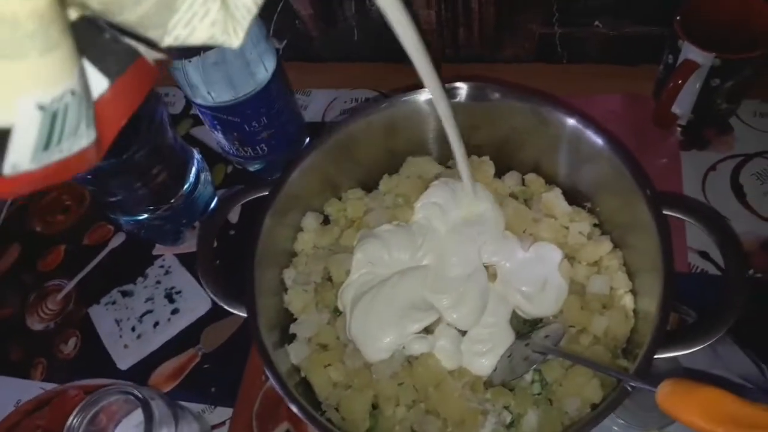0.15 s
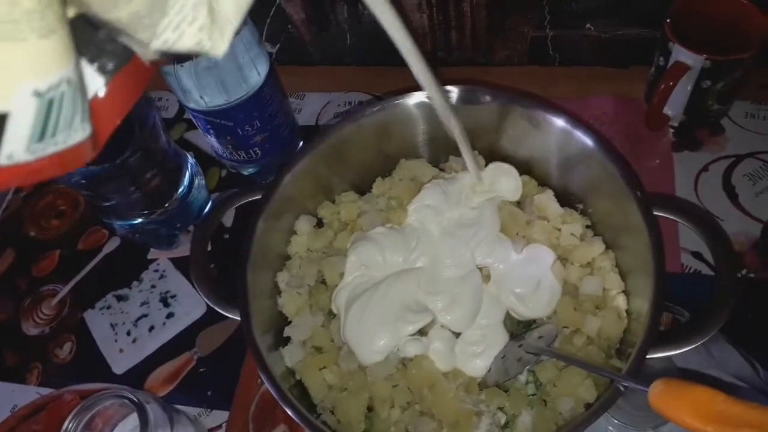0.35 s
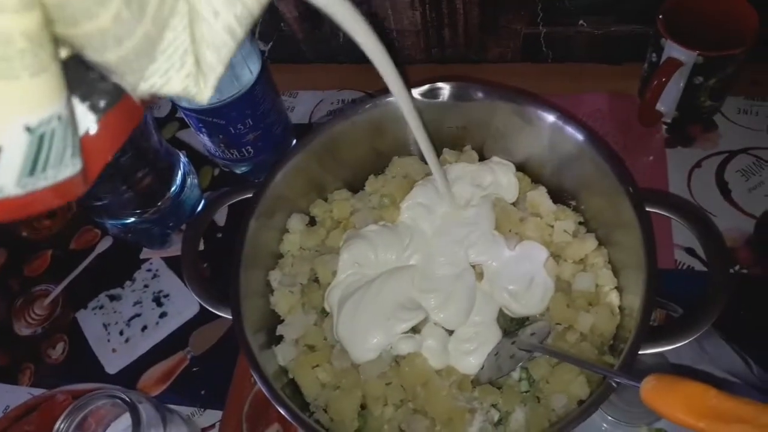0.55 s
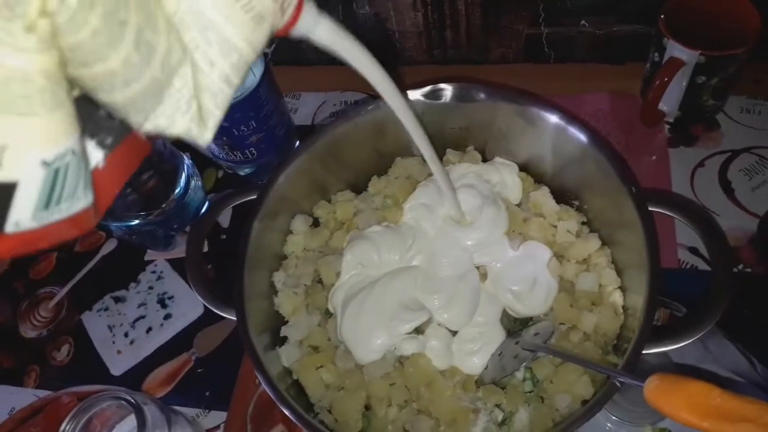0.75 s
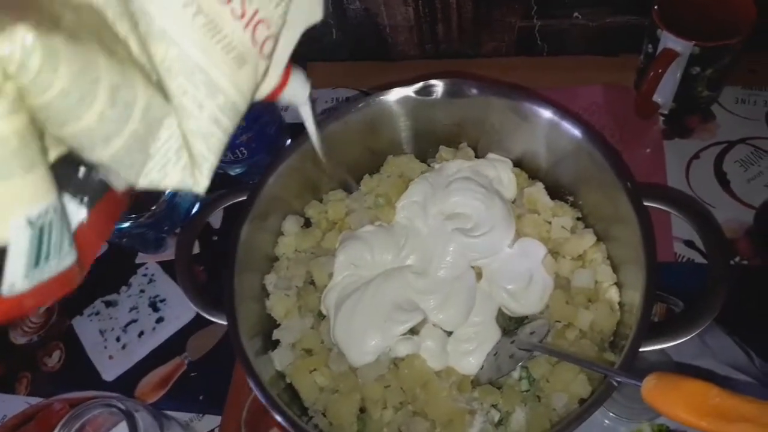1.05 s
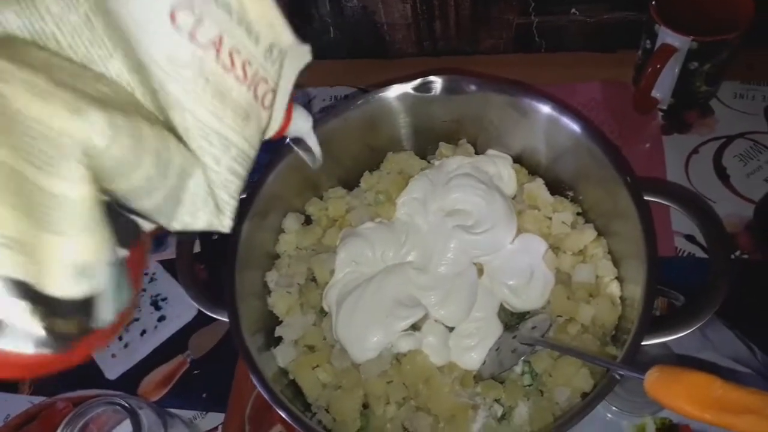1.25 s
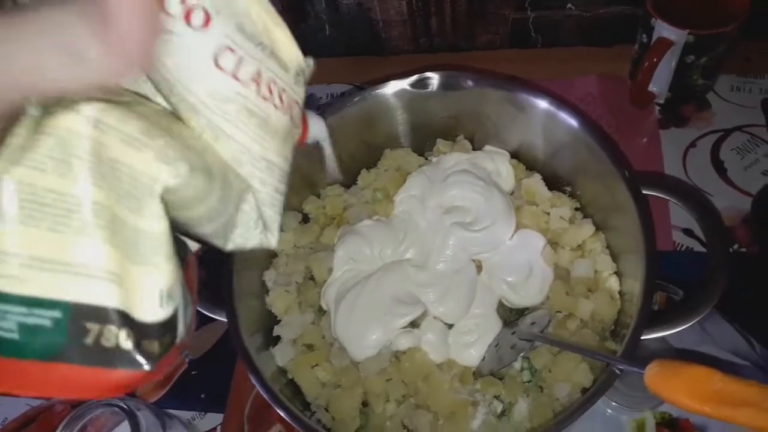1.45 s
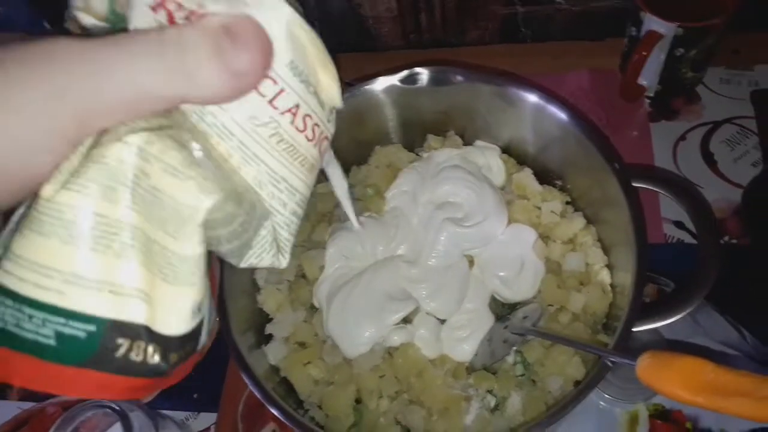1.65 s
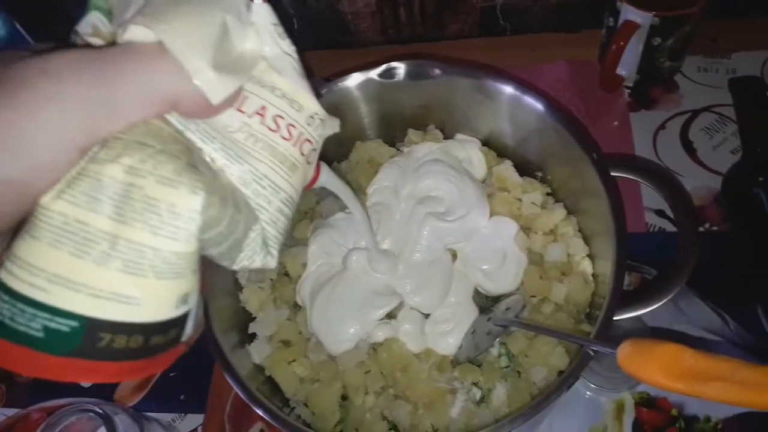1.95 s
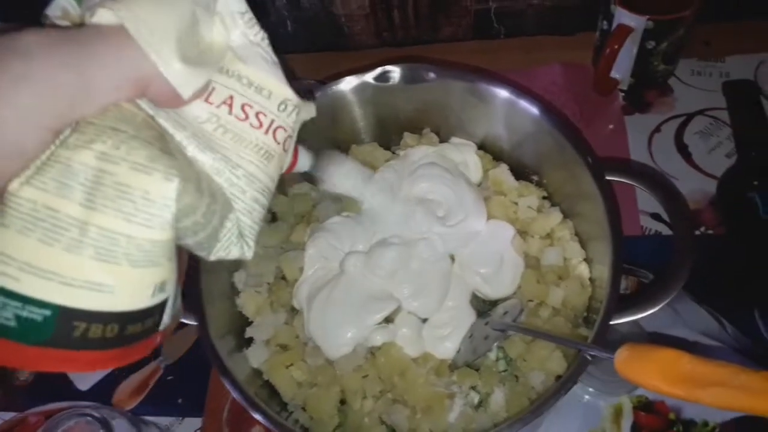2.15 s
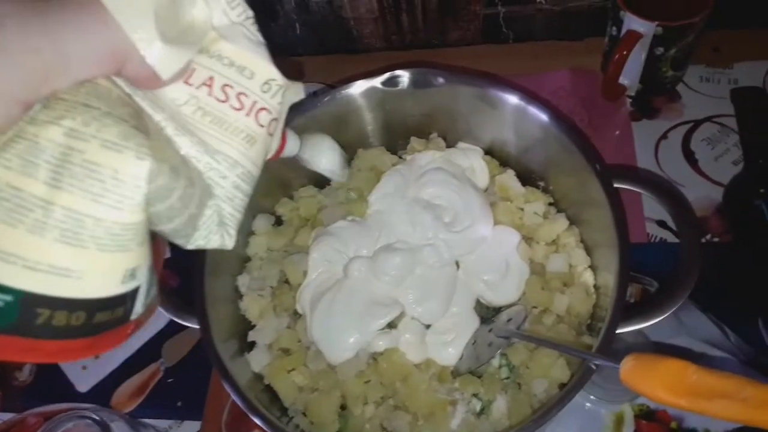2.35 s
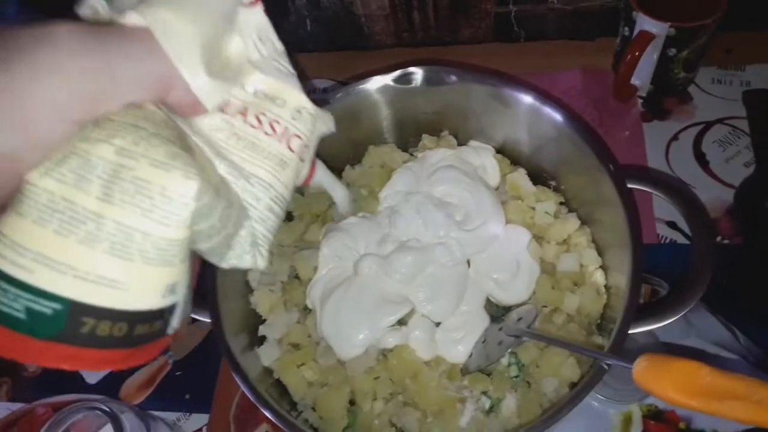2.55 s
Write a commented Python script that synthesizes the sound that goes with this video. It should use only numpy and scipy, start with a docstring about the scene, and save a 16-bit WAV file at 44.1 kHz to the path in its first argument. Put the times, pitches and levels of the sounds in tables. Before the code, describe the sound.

Mayonnaise squirts almost silently from a plastic pouch with tiny ringing pops, the film crinkles under a new grip, then trapped air splutters loudly through the nozzle, close up, echoing briefly around a kitchen.

```python
"""Mayonnaise from a pouch, close microphone

Mayonnaise is squeezed from a soft plastic pouch into a pot, close by in a small, live kitchen.
Tiny bubbles pop as ringing bursts over the wet clicks of the stream, which sputters out.
The film crackles under a new grip: short coloured clicks that excite the pouch and the taut film.
Then trapped air spits through the nozzle: a slowing run of loud, very fast upward chirps that fill the room."""
import sys
import numpy as np
from scipy import signal
from scipy.fft import rfft, irfft
from scipy.io import wavfile
from scipy.ndimage import uniform_filter1d, minimum_filter1d

SR = 44100
rng = np.random.default_rng(int(sys.argv[2]) if len(sys.argv) > 2 else 0)


def pcm_store(signal):
    """Save signal as 16-bit PCM."""
    levels = np.round(np.clip(np.atleast_2d(signal), -1, 1) * 32767)
    wavfile.write(sys.argv[1], SR, levels.astype(np.int16).T)


N = 119070
TOP_HZ = 15400  # upper limit of the pop bands and of the microphone signal


def undb(db):
    """Turn dB into an amplitude factor."""
    return 10 ** (np.asarray(db) / 20)


def unit(x):
    """Scale to rms 1."""
    return x / np.sqrt(np.mean(x ** 2) + 1e-20)


def on_log(points, hz):
    """Read (Hz, value) points on a log-frequency axis."""
    p = np.array(points)
    return np.interp(np.log(hz + 1), np.log(p[:, 0]), p[:, 1])


def curve(points):
    """Gain over time from (s, dB) points."""
    return undb(np.interp(np.arange(N) / SR, *np.array(points).T))


def response(points, size=2048):
    """Causal minimum-phase impulse response with the given (Hz, dB) colour, by folding the cepstrum."""
    hz = np.arange(size // 2 + 1) * SR / size
    cepstrum = irfft(np.log(undb(on_log(points, hz))))
    cepstrum[1:size // 2] *= 2
    cepstrum[size // 2 + 1:] = 0
    return irfft(np.exp(rfft(cepstrum)))


def colour(x, points):
    """Filter by (Hz, dB) points."""
    return signal.fftconvolve(x, response(points))[:len(x)]


def resonate(x, hz, width, db):
    """What one resonance adds to a sound: a peak at hz, width in Hz."""
    return undb(db) * signal.lfilter(*signal.iirpeak(hz, hz / width, fs=SR), x)


def add(out, start_s, x):
    """Mix a sound in at its time."""
    i = max(int(start_s * SR), 0)
    out[i:i + len(x)] += x[:max(N - i, 0)]


def ramp(u):
    """Smooth step from 0 to 1."""
    return np.sin(np.pi / 2 * np.clip(u, 0, 1)) ** 2


def background():
    """Room air as coloured noise, with a low sine hum and thin whines of narrow-band noise."""
    # Spectrum of the room air. Each row: frequency in Hz, relative density in dB per Hz.
    air_colour = [(18, -30.5), (30, -24.5), (189, -4), (319, -3.5), (394, -4), (740, -13), (822, -21.5),
                  (1160, -13.5), (1960, -31.5), (2680, -38), (4780, -27), (5600, -44.5), (8500, -32.5),
                  (10000, -53), (15500, -37.5)]
    # Level of the air at the microphone. Each row: time in seconds, level in dB.
    air_level = [(0, -55.5), (.4, -58), (.68, -57), (1.0, -54.5), (1.55, -56.5), (2.7, -65.5)]
    # Thin whines. Each row: frequency in Hz, width of each filter pass in Hz, dB against the air.
    whine_rows = [(5030, 40, -19), (14734, 60, -24.5)]
    hum_hz, hum_db = 104, -71.5
    t = np.arange(N) / SR
    air = unit(colour(rng.standard_normal(N), air_colour))
    for hz, width, db in whine_rows:
        once = resonate(rng.standard_normal(N), hz, width, 0)
        air = air + undb(db) * unit(resonate(once, hz, width, 0))
    hum = undb(hum_db) * unit(np.sin(2 * np.pi * hum_hz * t))
    return air * curve(air_level) + hum


def crackle():
    """Faint wet crackle of the stream and the flexing film: dense random clicks of uneven size."""
    # Level of the crackle close to the pouch, ahead of the room. Each row: time in seconds, level in dB.
    crackle_level = [(0, -61.5), (.45, -60.5), (.68, -73.5), (.8, -56.5), (.96, -54), (1.025, -47),
                     (1.07, -55), (1.2, -52), (1.5, -63), (1.68, -59.5), (1.95, -60.5), (2.4, -52),
                     (2.6, -67.5)]
    # Spectrum of the clicks. Each row: frequency in Hz, relative level in dB.
    click_colour = [(50, -14.5), (150, -25.5), (500, 5.5), (1400, 3.5), (2100, -0.5), (2700, 1.5),
                    (5000, -6.5), (8500, -11), (10500, -24.5), (13000, -16.5), (15500, -20.5)]
    clicks_per_s, spread_db = 1300, 2.5
    sizes = undb(spread_db * np.minimum(rng.exponential(size=N), 4)) * rng.choice([-1, 1], N)
    clicks = sizes * (rng.random(N) < clicks_per_s / SR)
    return unit(colour(clicks, click_colour)) * curve(crackle_level)


def pops(size=1024):
    """Tiny bubbles burst and ring briefly, in a band around their pitch; the briefest are broad ticks."""
    # Bubbles and wet ticks at the nozzle.
    # Each row: start in seconds, level in dB before the shared gain, pitch in Hz, decay constant in ms.
    pop_rows = [(.275, -34, 7400, 0.18), (.288, -36.5, 8700, 0.18), (0.524, -19.5, 10700, 0.083),
                (.541, -27.5, 7760, 0.12), (0.619, -31, 8840, 0.15), (0.68, -39, 7900, 0.17),
                (0.7346, -14, 7450, 0.95), (.7346, -23.5, 6200, .3), (0.7342, -29.5, 4630, 0.26),
                (0.735, -33, 3600, 1), (.753, -31, 7560, 1), (0.764, -27.5, 7330, 0.99),
                (0.8234, -14, 7710, 0.5), (0.837, -27, 1820, 0.29), (0.8911, -16, 8070, 0.22),
                (0.8915, -20.5, 6070, 0.25), (0.931, -34, 1010, 0.34), (2.041, -34, 13200, 0.63),
                (2.103, -31.5, 13600, 0.62), (2.106, -29, 7140, 0.4), (2.1284, -12, 11420, 0.076),
                (2.136, -20.5, 7650, .25), (2.1688, -21, 8330, 0.061), (2.1997, -16.5, 7230, 0.15),
                (2.2124, -23.5, 8680, 0.7), (2.2336, -18, 7750, 0.07), (2.2333, -12, 2400, 0.2),
                (2.235, -23.5, 5800, 0.5), (2.2314, -28, 12800, 0.05), (2.3607, -24.5, 10800, 0.011),
                (2.3638, -20.5, 5490, 0.75), (2.3881, -16.5, 3610, 0.27), (2.3874, -30.5, 9300, 0.04),
                (2.4609, -16, 7070, 0.08), (2.4623, -18.5, 3570, 0.45), (2.529, -36, 3236, 1),
                (2.562, -30, 3790, 0.4), (2.5628, -31.5, 8390, 0.13)]
    attack_ms, shared_db = 0.082, 4.5
    band_ratio, widen_ms = 1.06, 0.016  # band edge to pitch, and how much brief decays widen it
    out, t = np.zeros(N), np.arange(size) / SR
    ms = t * 1000
    for start, db, hz, decay in pop_rows:
        envelope = ramp(ms / attack_ms) * np.exp(-np.maximum(ms - attack_ms, 0) / decay)
        ring = envelope * np.sin(2 * np.pi * hz * t)
        ratio = np.clip(band_ratio + widen_ms / decay, 1.05, 2.5)
        band = signal.butter(2, [hz / ratio, min(hz * ratio, TOP_HZ)], "bandpass", fs=SR)
        add(out, start, undb(db + shared_db) * signal.lfilter(*band, ring))
    return out


def creases(size=1024):
    """Each crease snaps in one click, treble arriving first; the filled pouch and taut film ring on briefly."""
    # Creases snapping in the film.
    # Each row: start in seconds, pouch body in Hz, film panel in Hz, then relative levels in dB
    # of the bass, low middle, middle, high middle and treble.
    crease_rows = [(0.8375, 1810, 4400, -18, -20, -13, -23.5, -30),
                   (0.9426, 900, 3800, -8, -13, -13, -20.5, -23),
                   (1.006, 1280, 2700, -7, -7.5, -6, -13, -55),
                   (1.0101, 1200, 3500, -10, -27, -7, -26, -19),
                   (1.1618, 730, 3000, -3, -0.5, -2.5, -21.5, -48),
                   (1.1829, 800, 3100, -2.5, 9, 10, 0, -16), (1.2963, 830, 4550, 7.5, 15, 15.5, 5, -7),
                   (1.5928, 1680, 3070, 4.5, 3, 10.5, 5.5, -1.5),
                   (1.6449, 850, 3000, 4.5, 3.5, -3.5, -12.5, -19),
                   (1.673, 517, 3600, -1, -5, -4.5, -11, -17.5),
                   (1.684, 407, 3800, -0.5, -14, -18, -20.5, -34.5),
                   (1.7162, 1670, 2800, -21, -3.5, 1.5, -2.5, -15.5),
                   (1.7832, 1260, 2900, -12, -5.5, 5, -3.5, -12.5),
                   (1.8148, 960, 3000, -3.5, -4, 0.5, -32, -37),
                   (1.8266, 1510, 4150, -26.5, -15.5, 0, 3.5, 0), (1.862, 770, 3300, 3, 9.5, -1.5, 1.5, -5),
                   (1.8931, 1350, 3650, -1.5, 11.5, 9, 10.5, -2.5),
                   (1.9703, 543, 3300, 7.5, 8, 9.5, 2.5, -11.5)]
    # The five bands of those levels. Each row: lower edge in Hz, upper edge in Hz.
    band_edges = [(150, 275), (560, 1080), (1100, 1300), (2400, 4500), (5600, 9000)]
    # Colour of the film, shared by all creases. Each row: frequency in Hz, relative level in dB.
    film_colour = [(40, -47), (110, -9.5), (250, -6.5), (600, 1), (1000, -2.5), (1600, 1.5), (1850, -3.5),
                   (2080, -6.5), (2450, -0.5), (3700, -2), (4500, -2), (5150, -4), (5800, 2.5), (7300, 2),
                   (10000, -18), (15000, -25)]
    shared_db = -0.5
    ring_db, ring_decay_s, ring_rise_s = -7.5, 0.0031, 0.0023
    body_width_hz, body_db = 257, 0.5
    panel_width_hz, panel_db = 620, 5
    lag_ms = 0.888  # bending waves travel slower at low pitch: their delay at 1 kHz
    out, t = np.zeros(N), np.arange(size) / SR
    khz = np.arange(size // 2 + 1) * SR / size / 1000
    spread = np.exp(-4j * np.pi * lag_ms * np.sqrt(khz))  # delay falls as 1 / sqrt(frequency)
    for start, body_hz, panel_hz, *bands_db in crease_rows:
        rustle = rng.standard_normal(size) * np.exp(-t / ring_decay_s) * ramp(t / ring_rise_s)
        ring = undb(ring_db) * unit(rustle) / np.sqrt(size)
        ring[0] += 1  # the click itself
        points = [(hz, db) for edges, db in zip(band_edges, bands_db) for hz in edges]
        snap = response(points)
        body = resonate(snap, body_hz, body_width_hz, body_db)
        panel = resonate(snap, panel_hz, panel_width_hz, panel_db)
        dispersed = irfft(rfft(ring) * spread)
        add(out, start, undb(shared_db) * signal.fftconvolve(snap + body + panel, dispersed))
    return colour(out, film_colour)


def flutter(size):
    """Quick random wobble of rms 1, as the wet rim flaps."""
    time_scale_ms = 0.74
    window = np.hanning(max(int(2 * time_scale_ms * SR / 1000), 4))
    return unit(np.convolve(rng.standard_normal(size), window, "same"))


def fluttering_tone(hz, wet):
    """An air mode whose pitch wobbles at the flapping rim; its level wobbles more as wet grows to 1."""
    level_db, pitch_share = 2.5, 0.061  # rms wobble of level and of pitch
    level = undb(level_db * wet * flutter(len(hz)))
    wobbly_hz = hz * (1 + pitch_share * flutter(len(hz)))
    return level * np.sin(2 * np.pi * np.cumsum(wobbly_hz) / SR)


def spit_gate(ms, end_ms):
    """Level of a spit, opening quickly and half closed at its end."""
    attack_ms, release_ms = 0.88, 0.66
    return ramp(ms / attack_ms) * ramp((end_ms - ms) / (2 * release_ms) + .5)


def spits(size=4096):
    """A plug of sauce bursts; the air pocket behind it shrinks, its two modes shoot up and droplets spray."""
    # Air spitting through the nozzle. Each row: start in seconds, level in dB before the shared gain,
    # start pitch in Hz, mean rise in Hz per ms, length in ms, upper mode in dB, change of the lower mode
    # after the choke in dB, cavity in Hz, spray in dB before its decay.
    spit_rows = [(2.0399, 6.5, 1032, 531, 5.57, -10.5, 2.5, 1490, -20.5),
                 (2.0693, 0.5, 1180, 422, 5.8, -3, -3, 1500, -15),
                 (2.0989, 4, 1025, 550, 5.5, -10, -4.5, 1510, -14),
                 (2.1283, 3.5, 1224, 602, 6, -1.5, -1.5, 1610, -8.5),
                 (2.1572, 0, 1090, 523, 5.5, -6, -7, 1520, -18),
                 (2.212, -0.5, 1204, 540, 6.6, -4.5, -2, 1450, -40),
                 (2.2838, -8.5, 1068, 463, 8.77, -11, -4.5, 1360, -12.5),
                 (2.3592, -9.5, 1313, 540, 6.3, -4.5, -4.5, 1680, -25),
                 (2.4501, -36, 1087, 219, 17.8, -23, 11, 1520, -13)]
    # Colour of nozzle and pouch. Each row: frequency in Hz, relative level in dB.
    nozzle_colour = [(50, -42.5), (130, -11), (300, -6), (450, -5.5), (700, 1.5), (950, -6.5), (1500, -3.5),
                     (1900, -8.5), (2350, -5.5), (2900, -5), (3550, -4.5), (4000, -8.5), (4500, -2.5),
                     (5200, -14.5), (6300, -13), (8500, -10), (10500, -28), (13200, -26.5), (15000, -45.5)]
    shared_db = 0.5
    upper_mode_hz, upper_share = 2158, 0.68  # distance above the lower mode; share of the spit it lasts
    pitch_bend = 0.642  # share of the rise that is held back until late in the spit
    # the sauce half closes the spout midway: when (share of the length), how long, how deep
    choke_share, choke_width_ms, choke_db = 0.54, 0.64, -2
    puff_db, puff_edge_hz = -17.5, 3760  # the dull rush of air
    spray_decay_s, droplets_per_s = 0.005, 1200
    cavity_width_hz, cavity_db = 350, -10.5  # air cavity behind the spout
    spout_ratio, spout_width_hz, spout_db = 2.42, 510, -2  # its second resonance
    out, t = np.zeros(N), np.arange(size) / SR
    ms = t * 1000
    puff_filter = signal.butter(4, puff_edge_hz, fs=SR)
    for start, db, hz, rise, length, upper_db, late_db, cavity_hz, spray_db in spit_rows:
        gate = spit_gate(ms, length)
        past = (ms - choke_share * length) / choke_width_ms
        choke = undb(choke_db * np.exp(-past ** 2) + late_db * ramp(past / 2 + .5))
        pitch = hz + rise * ms * (1 - pitch_bend + pitch_bend * ms / length)
        wet = ramp(ms / length * 2)
        lower = choke * gate * fluttering_tone(pitch, wet)
        upper_gate = spit_gate(ms, length * upper_share)
        upper = undb(upper_db) * upper_gate * fluttering_tone(pitch + upper_mode_hz, wet)
        rush = signal.lfilter(*puff_filter, rng.standard_normal(size))
        puff = undb(puff_db) * gate * unit(rush)
        droplets = rng.standard_normal(size) * (rng.random(size) < droplets_per_s / SR)
        spray = undb(spray_db) * unit(droplets) * np.exp(-t / spray_decay_s)
        jet = undb(db + shared_db) * (lower + upper + puff + spray)
        cavity = resonate(jet, cavity_hz, cavity_width_hz, cavity_db)
        spout = resonate(jet, cavity_hz * spout_ratio, spout_width_hz, spout_db)
        add(out, start, jet + cavity + spout)
    return colour(out, nozzle_colour)


def kitchen(x, count=10):
    """Early echoes off wall and cupboards, then a diffuse noise tail; each band dies at its own rate."""
    # Colour of the echoes. Each row: frequency in Hz, relative level in dB.
    echo_colour = [(50, -6.5), (140, 1.5), (250, 2), (600, -3.5), (1500, -5), (3000, -6), (5000, -6),
                   (8000, -7), (14000, 0)]
    # Reverberation time. Each row: frequency in Hz, time to fall by 60 dB in seconds.
    decay_times = [(150, 0.32), (700, 0.33), (2000, 0.38), (4000, 0.32), (8000, 0.2), (14000, 0.41)]
    tail_db, tail_delay_s = -6.5, 0.011
    early_db, early_decay_s, early_rise_s = -5.5, 0.017, 0.0098
    t, hz = np.arange(SR) / SR, np.arange(SR // 2 + 1)
    noise, tail = rfft(rng.standard_normal(SR)), 0
    centres = np.geomspace(100, 16000, count)
    for centre, weights in zip(centres, np.eye(count)):
        # overlapping triangular bands on the log-frequency axis
        band = irfft(noise * on_log(list(zip(centres, weights)), hz), SR)
        tail = tail + band * np.exp(-np.log(1000) * t / on_log(decay_times, centre))
    early = rng.standard_normal(SR) * np.exp(-t / early_decay_s) * ramp(t / early_rise_s)
    late = undb(tail_db) * unit(tail * ramp(t / tail_delay_s - 1))
    echo = (late + undb(early_db) * unit(early)) / np.sqrt(SR)
    return x + signal.fftconvolve(x, colour(echo, echo_colour))[:N]


def scene():
    """Pouch, stream and nozzle sound in the kitchen, over its background."""
    close = crackle() + pops() + creases() + spits()
    return (kitchen(close) + background())[None]


def record(dry):
    """A fast limiter turns down the loudest peaks; a steep low-pass cuts the top."""
    limit, limit_s = .96, 0.008
    width = max(int(limit_s * SR), 3)
    needed = np.minimum(1, limit / (np.abs(dry) + 1e-9))
    gain = uniform_filter1d(minimum_filter1d(needed, width), width)
    low_pass = signal.ellip(8, .2, 70, TOP_HZ, fs=SR, output="sos")
    return signal.sosfilt(low_pass, dry * gain)


dry = scene()
out = record(dry)
pcm_store(out)
```